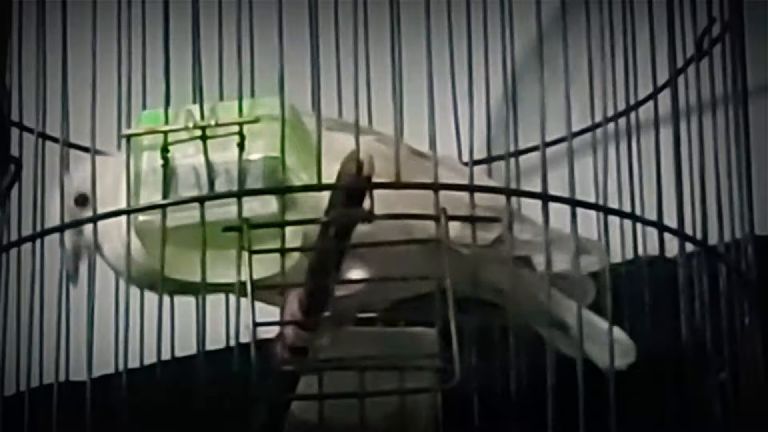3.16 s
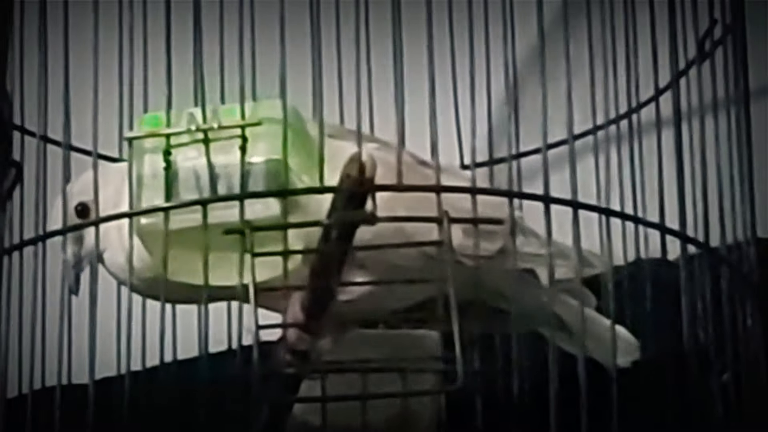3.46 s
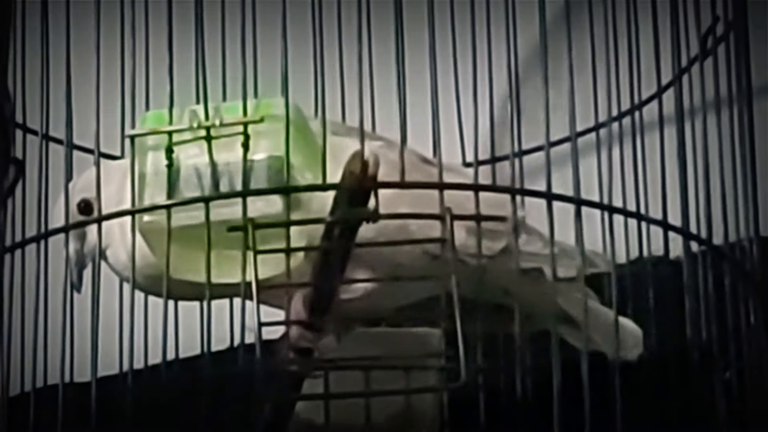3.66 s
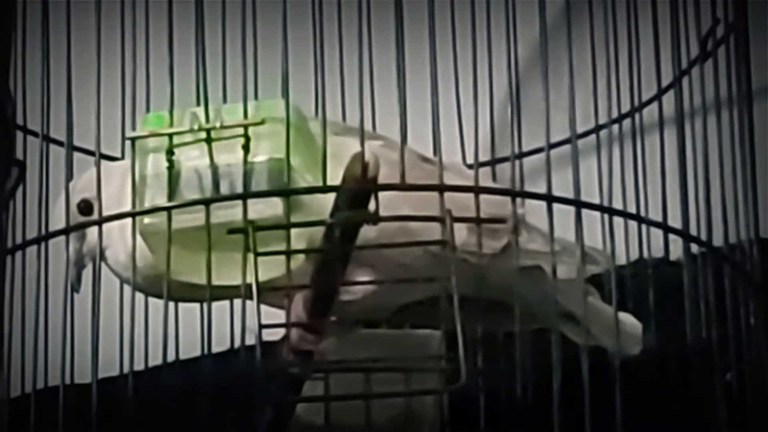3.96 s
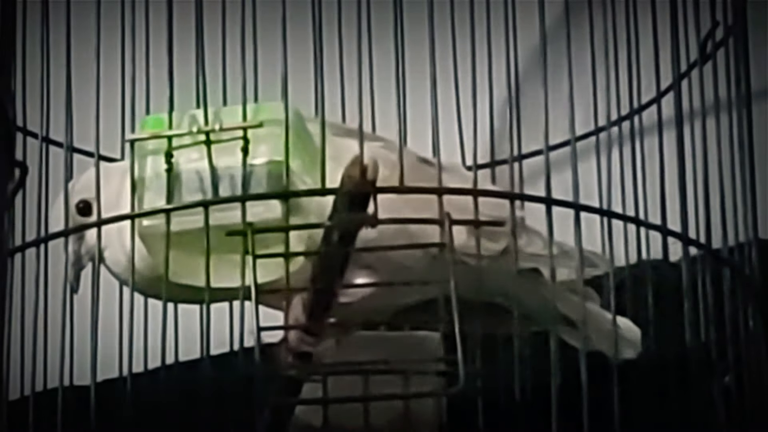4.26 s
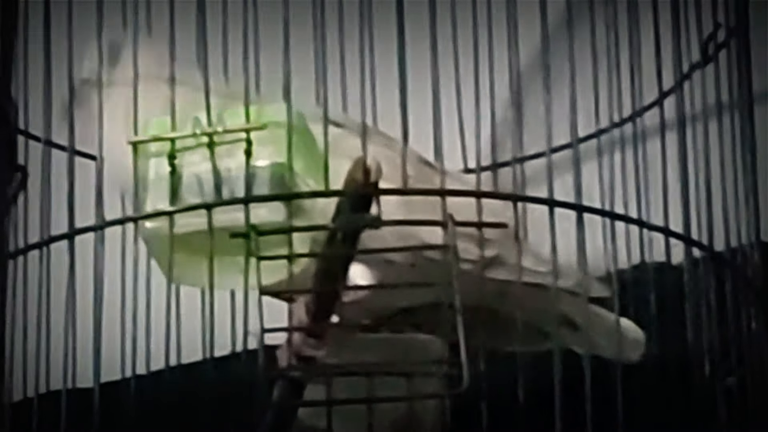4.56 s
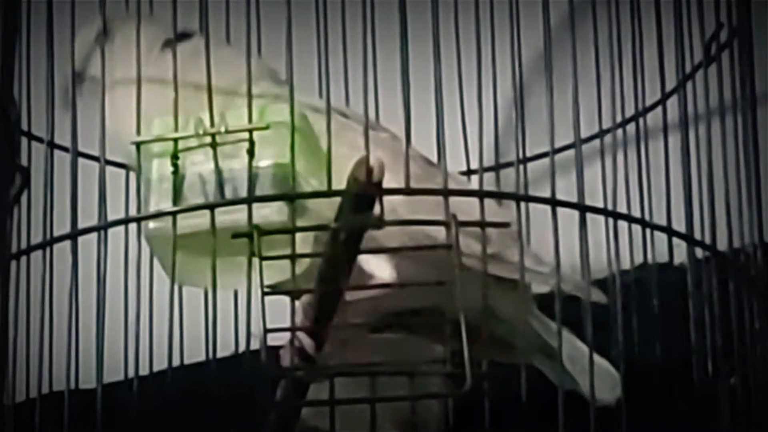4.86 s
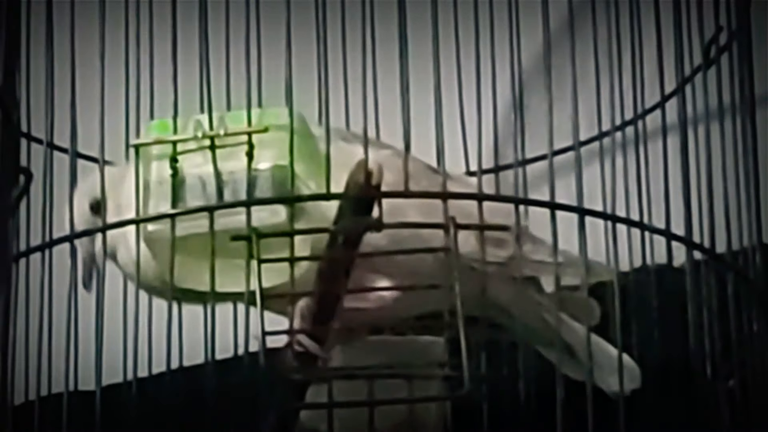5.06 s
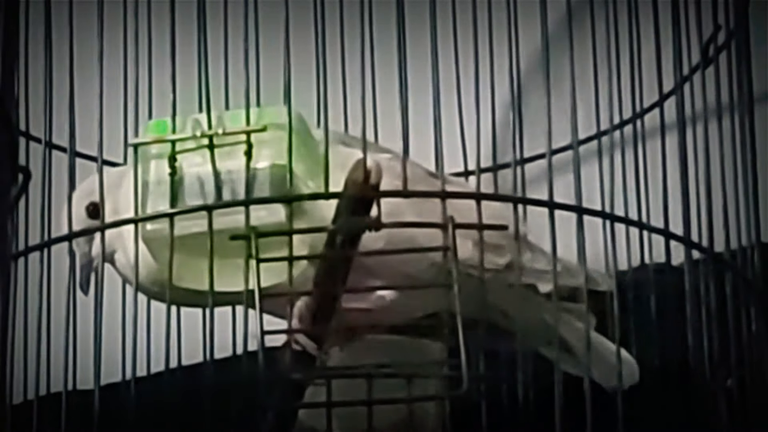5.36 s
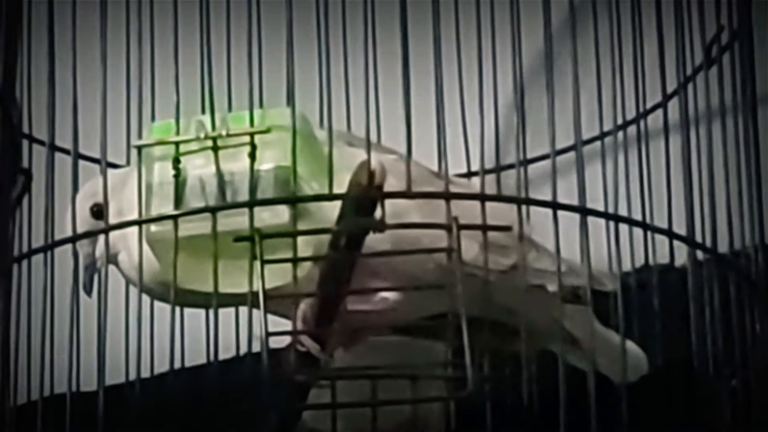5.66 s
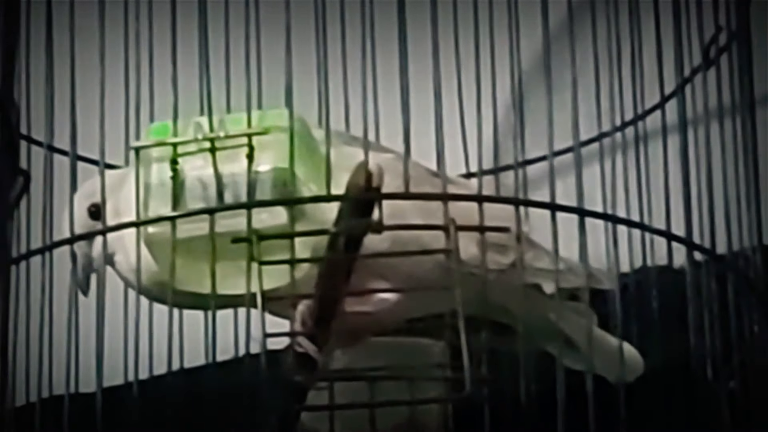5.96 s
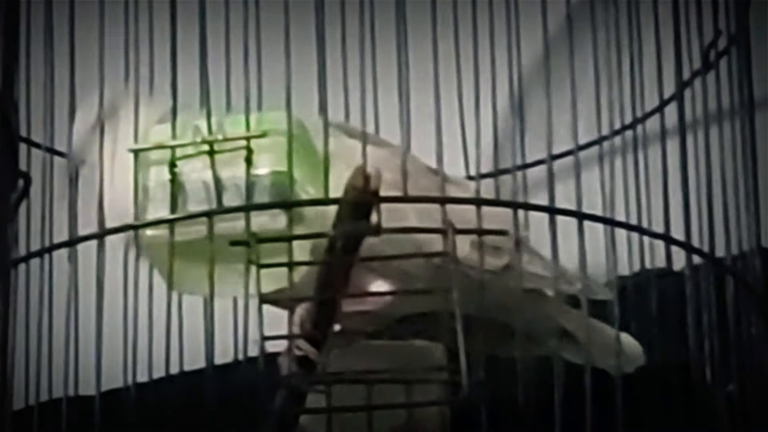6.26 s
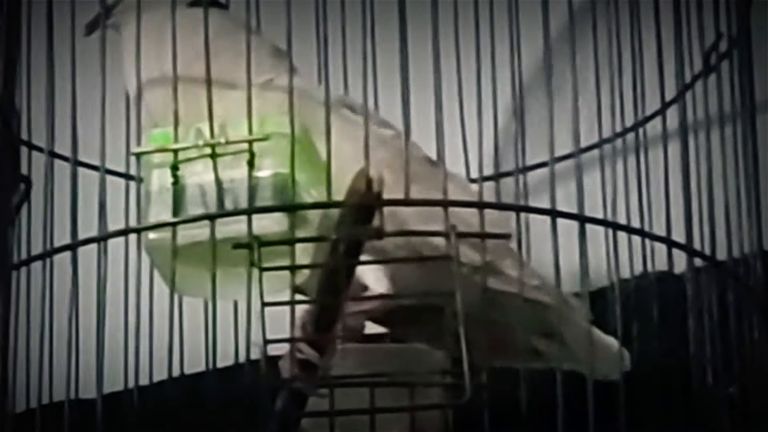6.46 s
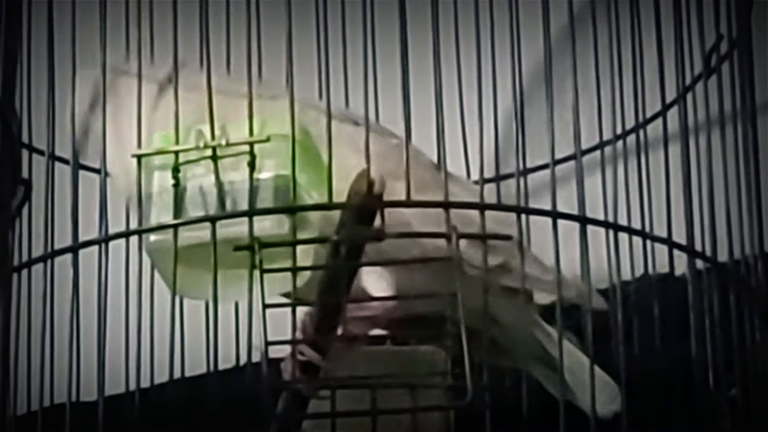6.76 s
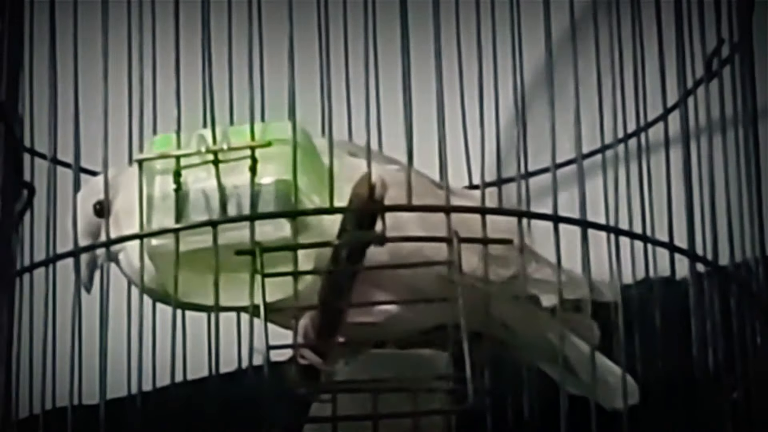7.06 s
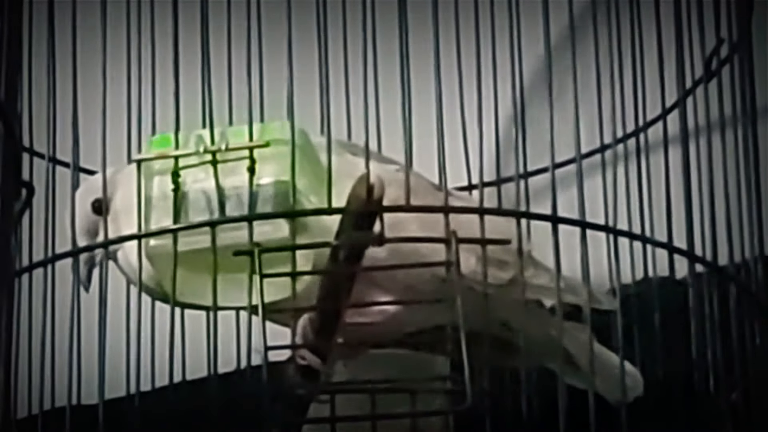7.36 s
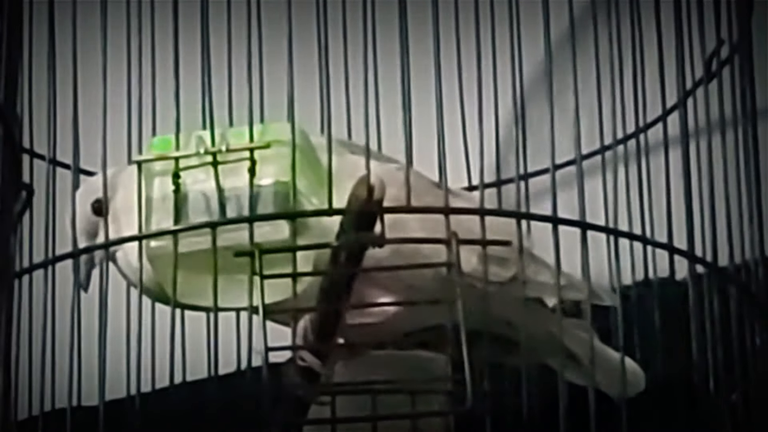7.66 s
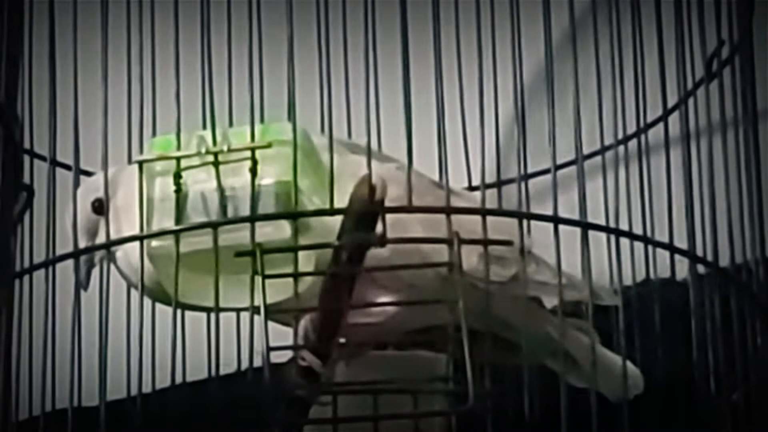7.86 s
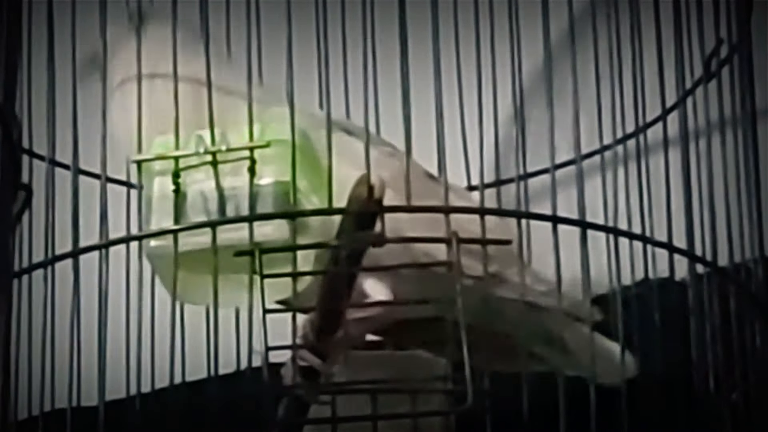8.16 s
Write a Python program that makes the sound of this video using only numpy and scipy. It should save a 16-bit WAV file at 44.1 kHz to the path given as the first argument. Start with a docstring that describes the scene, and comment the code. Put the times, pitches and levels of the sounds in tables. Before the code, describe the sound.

Close by, a dove in a cage repeats a loud, rolling call about every two seconds. Each round has a rising trill, a long coo with a falling tail, quiet wheezy breaths and a brief raspy coo. The walls of the small room add a short echo. Feathers brush the wires once, very softly, about halfway through, over a faint hum and hiss.

```python
"""A swelling trill opens the song of a caged dove, bowing and cooing close by in a small bare room.
Each trill runs into a long coo that turns rough, then pure, and breaks downward; soft wheezes follow
as the dove refills its crop, and a short hoarse coo leads to the next trill. Vibrating membranes in
the syrinx make the tone, the swollen crop filters it, and wall reflections colour every note.
A low hum, a thin hiss and one shuffle of feathers lie underneath."""
import sys
import numpy as np
from scipy import signal
from scipy.fft import rfft, irfft
from scipy.io import wavfile
from scipy.ndimage import uniform_filter1d, minimum_filter1d

SR = 44100
rng = np.random.default_rng(int(sys.argv[2]) if len(sys.argv) > 2 else 0)


def output_pcm(signal):
    """Save a mono or channel-first signal as 16-bit PCM at the path in sys.argv[1].

    Samples are clipped to [-1, 1] before scaling.
    """
    pcm = np.clip(np.atleast_2d(signal).T, -1, 1) * 32767
    wavfile.write(sys.argv[1], SR, np.round(pcm).astype(np.int16))


N = 410571
TIME = np.arange(N) / SR
STEP_S = .002  # spacing of the points on a contour


def amp(db):
    """Decibels to amplitude ratio."""
    return 10 ** (np.asarray(db) / 20)


def unit(x):
    """Normalisation to rms 1."""
    return x / np.sqrt(np.mean(x ** 2) + 1e-20)


def noise(points):
    """Spectral shaping: white noise takes on a spectrum of (frequency_hz, level_db) points."""
    hz, db = np.transpose(points)
    shape = np.interp(np.log(np.fft.rfftfreq(N, 1 / SR) + 1), np.log(hz), db)
    return unit(irfft(rfft(rng.standard_normal(N)) * amp(shape), N))


def band(size, hz, width_hz):
    """Band-limited noise with a Gaussian spectrum; centred on 0 Hz it is a random wander."""
    shape = np.exp(-.5 * ((np.fft.rfftfreq(size, 1 / SR) - hz) / width_hz) ** 2)
    return unit(irfft(rfft(rng.standard_normal(size)) * shape, size))


def add(mix, start_s, sound):
    """Superposition: a sound joins the mix at start_s."""
    start = round(start_s * SR)
    sound = sound[max(-start, 0):]
    part = mix[max(start, 0):][:len(sound)]
    part += sound[:len(part)]


def curves(times, *contours):
    t = np.arange(times[0], times[-1], 1 / SR)
    return [t] + [np.interp(t, times, contour) for contour in contours]


def ramp(t, start, seconds):
    """Linear rise from 0 to 1."""
    return np.clip((t - start) / seconds, 0, 1)


def fade(t, seconds):
    """Raised-cosine taper at both ends."""
    return np.sin(np.pi / 2 * ramp(np.minimum(t - t[0], t[-1] - t), 0, seconds)) ** 2


# Overtones of the voice, away from resonance: frequency_ratio, level_db
VOICE_OVERTONES = [(1.5, -53), (2, -48), (4, -55)]
def syrinx(hz, pipe_hz=905):
    """Source and filter: the swollen crop holds back overtones, save near the windpipe's resonances."""
    phase = 2 * np.pi * np.cumsum(hz) / SR
    tone = np.sin(phase)
    for ratio, db in VOICE_OVERTONES:
        resonance_db = 9 * np.cos(np.pi * ratio * hz / pipe_hz) ** 24
        tone += amp(db + resonance_db) * np.sin(ratio * phase)
    return np.sqrt(2) * tone


# Trills: crest_s, end_s, crest_relative_db, crest_pitch_hz, swell_per_pulse_db, late_gap_s
TRILL_PHRASES = [ (.054, .165, -7.5, 523.6, -0.5, .051), (1.998, 2.16, -7, 508, 4.5, .071),
                 (3.862, 4.03, -8, 514, 4, .05), (5.763, 5.92, -8.5, 514, 4.5, .072),
                 (7.604, 7.69, -7.5, 521, 4, .059), (9.442, 9.46, -4, 542, 5, .06)]
def trill(crest_s, end_s, crest_db, crest_hz, swell_db, late_gap_s):
    """Pulse modulation: pulses of tone slow down and climb to a crest, then may run on evenly."""
    quick_gap_s, crest_gap_s, low_hz, late_hz, sag_hz = .039, .067, 440, 501.2, 85
    before_crest = np.arange(7)
    gaps = quick_gap_s + (crest_gap_s - quick_gap_s) * .6 ** before_crest
    rising = np.c_[crest_s + gaps - np.cumsum(gaps),
                   crest_db - swell_db * before_crest,
                   low_hz + (crest_hz - low_hz) * .55 ** before_crest]
    late = [(s, crest_db - 4, late_hz) for s in np.arange(crest_s + late_gap_s, end_s, late_gap_s)]
    pulse_s, db, hz = np.transpose([*rising[::-1], *late])
    t = np.arange(pulse_s[0] - .04, pulse_s[-1] + .02, 1 / SR)
    since = t - pulse_s[:, None]
    width_s = .0098 * amp(.46 * np.minimum(db[:, None] + 10, 0))  # weak pulses are brief
    pulses = amp(db) @ np.exp(-abs(since / width_s) ** 2.5)
    # strong pulses leave a lower, weaker shoulder
    shoulders = amp(db - 11 + .5 * (db + 18.5)) @ np.exp(-((since - .023) / .009) ** 2)
    arch = np.exp(-(since / .019) ** 2).max(0)
    strength = amp(.3 * (np.interp(t, pulse_s, db) + 10.5))
    pitch = np.interp(t, pulse_s, hz) - sag_hz * (1 - arch) * strength
    pitch = (pitch + np.maximum(pitch, low_hz)) / 2  # the membranes resist going slack
    pitch += 7 * band(len(t), 0, 130)  # a slight unsteadiness
    return t[0], amp(5.5) * (pulses + shoulders) * syrinx(pitch) * fade(t, .005)


# Direct path, then wall and cage reflections, to each side: delay_ms, gain
LEFT_ARRIVALS = [(0, 1.01), (1.45, .28), (3.9, .32), (10.85, .26), (13.3, .7), (17.75, .21), (24.4, .4),
                 (31.7, .34), (37.8, .36), (47.7, .28), (58.75, .29), (76.6, .22), (92.4, .27)]
RIGHT_ARRIVALS = [(0, 1.05), (.45, .16), (6.05, .45), (12.8, .21), (19.8, .25), (31.8, .23), (33.3, .17),
                  (37.6, .36), (43.15, .26), (51.5, .22), (58.95, .31)]
def room(x, tail_db=-11, t60_s=.72, build_s=.1):
    """Convolution: strong early reflections comb-filter the sound, and diffuse reverberation follows."""
    t, channels = np.arange(SR // 2) / SR, []
    for arrivals in LEFT_ARRIVALS, RIGHT_ARRIVALS:
        response = rng.standard_normal(len(t)) * amp(-60 * t / t60_s) * ramp(t, 0, build_s) ** 2
        response *= amp(tail_db) / np.linalg.norm(response)
        for delay_ms, gain in arrivals:
            response[round(delay_ms * SR / 1000)] += gain
        channels.append(signal.fftconvolve(x, response)[:N])
    return np.array(channels)


# Spectrum of air rushing through the throat: frequency_hz, relative_density_db
BREATH_SPECTRUM = [(100, 2), (700, 7), (1050, -3), (1300, 0), (1850, -4.5), (2800, -21), (9000, -38)]
def breath(voice, edge_hz=635, lag_s=.025):
    """Flow noise: rushing air grows with the hoarse upper edge of the voice, mostly on the right."""
    mono = voice.mean(0)
    highpass = signal.firwin(2047, edge_hz, pass_zero=False, fs=SR)
    edge = signal.fftconvolve(mono, highpass, "same") + .035 * mono  # even a pure note leaks air
    effort = abs(uniform_filter1d(edge ** 2, size=3500)) ** .3
    effort = np.interp(TIME - lag_s, TIME, effort)
    return amp(-21.5) * effort * np.array([amp(-9) * noise(BREATH_SPECTRUM), noise(BREATH_SPECTRUM)])


# Spectrum of the room at rest: frequency_hz, relative_density_db
AMBIENT_SPECTRUM = [(30, -23.5), (70, -7.5), (250, -2), (800, -18), (2000, -24.5), (2300, -14),
                    (2700, -27.5), (8600, -32), (9300, -34.5), (14000, -34.5)]
def ambience(bass_hz=400):
    """Partial coherence: each side has its own room noise, and both share a bass layer."""
    separate = np.array([amp(-1.5) * noise(AMBIENT_SPECTRUM), noise(AMBIENT_SPECTRUM)])
    bass = signal.sosfilt(signal.butter(2, bass_hz, fs=SR, output="sos"), noise(AMBIENT_SPECTRUM))
    return amp(-52) * (separate + bass)


# Contour of the low hum: time_s, relative_db
HUM_CONTOUR = [(1.7, -51), (2.7, -59), (5.3, -65.5), (5.9, -55), (7.6, -51), (9.3, -52.5)]
def hum(pitch_hz=65.8):
    """Random amplitude modulation: a low sinusoid wavers as its level drifts."""
    level = amp(np.interp(TIME, *np.transpose(HUM_CONTOUR)))
    waver = 1 + .22 * band(N, 0, 8)
    return level * waver * np.sqrt(2) * np.sin(2 * np.pi * pitch_hz * TIME)


# Drones of the cage: start_s, length_s, relative_db
CAGE_DRONES = [(-.05, 0.23, -35), (1.94, 0.22, -39), (3.931, .22, -39.5), (7.941, .1, -40)]
def cage_drone(pitch_hz=119):
    """Resonance: the cage drones briefly in some phrases, a tone within a narrow band of noise."""
    mix = np.zeros(N)
    for start_s, length_s, db in CAGE_DRONES:
        t = np.arange(0, length_s, 1 / SR)
        tone = np.sin(2 * np.pi * pitch_hz * t) + .2 * band(len(t), pitch_hz, 30)
        add(mix, start_s, amp(db) * fade(t, .04) * tone)
    return mix


# Bands of thin hiss: centre_hz, width_hz, relative_db
HISS_BANDS = [(6254, 380, -57), (7880, 520, -66.5)]
def hiss(throb_hz=8.3, depth=.24):
    """Periodic amplitude modulation: narrow bands of high noise throb."""
    sides = [sum(amp(db) * band(N, hz, width) for hz, width, db in HISS_BANDS) for _ in range(2)]
    return np.array(sides) * (1 + depth * np.sin(2 * np.pi * throb_hz * TIME))


def rough_voice(t, db, hz, rough, rattle_hz, jitter, swing_hz):
    """Amplitude and frequency modulation: uneven membrane flapping chops the tone and shakes its pitch."""
    flap_phase = 2 * np.pi * np.cumsum(rattle_hz * (1 + jitter * band(len(t), 0, 50))) / SR
    chop = np.exp(rough * (.81 * np.cos(flap_phase) + .33 * band(len(t), 0, 78)))
    chop /= np.sqrt(uniform_filter1d(chop ** 2, size=1500))  # roughness leaves the power steady
    pitch = hz + rough * swing_hz * (np.sin(flap_phase + .25) + .98 * band(len(t), 0, 190))
    return amp(db) * chop * syrinx(pitch) * fade(t, .009)


# Long coos, levels relative: start_s, second_push_s, pure_s, break_s, end_s, first_push_db,
# second_push_db, rough_db, pure_db, crest_db, tail_db, top_hz, tail_hz, climb_roughness
LONG_COO_PHRASES = [ (0.171, 0.417, 0.452, .585, .958, 13.5, 8.5, -23, -26, -5.5, -14, 551.4, 469, 0.81),
                    (2.145, 2.333, 2.38, 2.534, 2.69, 11.5, 6.5, -21, -20.5, -7, -16.5, 547, 467, 0.66),
                    (4.015, 4.108, 4.215, 4.42, 4.58, 6.5, 5, -21.5, -17, -9, -16, 551.4, 469, 0.74),
                    (5.915, 6.012, 6.06, 6.255, 6.368, 7, 1.5, -23.5, -19.5, -8, -18.5, 554.7, 463, 0.97),
                    (7.685, 7.846, 7.905, 8.066, 8.165, 6, 5.5, -22.5, -17, -9, -18.5, 558.4, 464.8, 0.88)]
def long_coo(start_s, second_s, pure_s, break_s, end_s, first_db, second_db,
             rough_db, pure_db, crest_db, tail_db, top_hz, tail_hz, rough):
    """Changes of vibration regime: a rough climb clears to a pure note, then breaks to a sagging tail."""
    climb_from_hz, droop_hz, clearing_s, breaking_s, pure_rough = 528, 28.74, .024, .02, .079
    sag_hz_per_s, decay_db_per_s, dip_hz_per_db = 55, 26, 2.5
    t = np.arange(start_s, end_s, STEP_S)
    since_break = t - break_s
    push_db = first_db * np.exp(-((t - start_s) / .05) ** 2)
    push_db += second_db * np.exp(-((t - second_s) / .035) ** 2)
    # each regime holds level_db, pitch_hz, roughness
    climb = [rough_db + push_db,
             top_hz + (climb_from_hz - top_hz) * np.exp((start_s - t) / .13) - dip_hz_per_db * push_db,
             .55 + (rough - .55) * ramp(t, start_s, .013)]
    pure = [pure_db + (crest_db - pure_db) * ramp(t, pure_s, break_s - pure_s) ** 1.1,
            top_hz - droop_hz * np.exp(np.minimum(since_break, 0) / .032),
            np.full(len(t), pure_rough)]
    spent = np.exp((t - end_s) / (.18 * (end_s - break_s)))  # the dove runs out of air
    tail = [tail_db - decay_db_per_s * since_break - 2.5 * spent,
            tail_hz - sag_hz_per_s * since_break - 81 * spent,
            pure_rough + .57 * spent ** 2]
    cleared = ramp(t, pure_s - clearing_s / 2, clearing_s)
    broken = ramp(t, break_s - breaking_s / 2, breaking_s)
    contours = (1 - cleared) * climb + (cleared - broken) * pure + broken * tail
    voice = rough_voice(*curves(t, *contours), rattle_hz=61.42, jitter=.3, swing_hz=32.3)
    return start_s, amp(1.5) * voice


# Wheezy puffs: start_s, end_s, relative_db, start_pitch_hz, end_pitch_hz, throat_hz, roughness
WHEEZE_PUFFS = [ (1.01, 1.155, -23, 236.3, 231.3, 472, 0.26), (1.188, 1.313, -28.5, 237.7, 231.7, 715, .65),
                (2.769, 2.934, -40, 207.6, 211, 620, 0.26), (2.891, 3.152, -29, 214.7, 242.8, 630, 0.59),
                (4.659, 4.925, -31, 207.8, 198.3, 537, 0.22), (4.847, 5.043, -28.5, 179.8, 182.3, 667, .45),
                (6.448, 6.703, -34.5, 196.7, 184.4, 534, 0.22),
                (6.685, 6.875, -30, 199.4, 185.6, 664, 0.47), (8.281, 8.43, -34, 195.5, 184.3, 530, 0.19),
                (8.438, 8.559, -35, 163.5, 165, 630, 0.15), (8.549, 8.75, -33, 185, 178, 704, 0.3)]
def wheeze(start_s, end_s, peak_db, start_hz, end_hz, throat_hz, mid_rough):
    """Formant filtering: a low buzz is strongest near the throat resonance and frays as it turns hoarse."""
    arch_db, throat_rise_hz, throat_width_hz, crop_hz, crop_width_hz = 6.5, 25, 90, 520, 240
    t, = curves(np.arange(start_s, end_s, STEP_S))
    progress = ramp(t, start_s, end_s - start_s)
    db = peak_db - arch_db * (2 * progress - 1) ** 2
    hz = start_hz + (end_hz - start_hz) * progress
    formant_hz = throat_hz + throat_rise_hz * (progress - .5)  # the throat tightens
    rough = np.clip(mid_rough * (1 + .57 * (progress - .5)), 0, 1)
    phase = 2 * np.pi * np.cumsum(hz * (1 + .07 * rough * band(len(t), 0, 95))) / SR
    orders = np.arange(1, 6)[:, None]
    throat = np.exp(-.5 * ((orders * hz - formant_hz) / throat_width_hz) ** 2)
    crop = np.exp(-.5 * ((orders * hz - crop_hz) / crop_width_hz) ** 2)  # the crop radiates a broad band
    weights = throat + amp(-7) * crop
    weights /= np.sqrt((weights ** 2).sum(0))
    buzz = np.zeros(len(t))
    for k, weight in zip(orders, weights):
        frayed = band(len(t), 0, 83) * np.sin(k * phase) + band(len(t), 0, 130) * np.cos(k * phase)
        buzz += weight * (np.sqrt(2 - 2 * rough) * np.sin(k * phase) + rough * frayed)
    return start_s, amp(db - 2) * buzz * fade(t, .016)


# Short coos: start_s, length_s, relative_db, accent_db, top_pitch_hz, closing_pitch_hz
SHORT_COO_PHRASES = [ (1.318, 0.24, -23.5, 3.5, 579.4, 532.7), (3.162, 0.24, -23, 3.5, 576.4, 535.7),
                     (5.06, .27, -23.5, 3.5, 576.6, 492.9), (6.879, 0.26, -22.5, 0.5, 553.8, 525),
                     (8.724, 0.25, -23.5, 3, 580.3, 544.8)]
def short_coo(start_s, length_s, body_db, accent_db, top_hz, closing_hz):
    """Roughness from deepening modulation: a clear accent leaps in pitch, starts to rattle and settles."""
    opening_hz, attack_s, peak_s, settle_s, roughen_s, release_s = 484.7, .013, .085, .1, .06, .06
    t = np.arange(0, length_s, STEP_S)
    db = body_db + accent_db * np.exp(-(np.maximum(t - attack_s, 0) / .035) ** 2)
    db -= 7 * (1 - ramp(t, 0, attack_s)) + 9 * ramp(t, length_s - release_s, release_s)
    hz = opening_hz + (top_hz - opening_hz) * ramp(t, 0, peak_s)
    hz += (closing_hz - top_hz) * ramp(t, peak_s, settle_s)
    rough = .35 + .55 * ramp(t, 0, roughen_s)
    voice = rough_voice(*curves(t, db, hz, rough), rattle_hz=81.42, jitter=.18, swing_hz=46.5)
    return start_s, amp(3) * voice


# Feathers brushing the wires: start_s, level_db, decay_s
FEATHER_BRUSHES = [(4.87, -58.5, 0.38), (4.975, -53, .04), (5.12, -57.5, 0.1)]
def feathers():
    """Friction noise: short dry swishes die away exponentially as the dove bows."""
    envelope = np.zeros(N)
    t = np.arange(SR // 2) / SR
    for start_s, db, decay_s in FEATHER_BRUSHES:
        add(envelope, start_s, amp(db) * np.exp(-t / decay_s) * fade(t, .004))
    return envelope * np.array([band(N, 7500, 5000), band(N, 7500, 5000)])


def scene():
    """Superposition: the reverberant voice sums with breath, background and feathers."""
    coos, wheezes = np.zeros((2, N))
    for row in TRILL_PHRASES:
        add(coos, *trill(*row))
    for row in LONG_COO_PHRASES:
        add(coos, *long_coo(*row))
    for row in SHORT_COO_PHRASES:
        add(coos, *short_coo(*row))
    for row in WHEEZE_PUFFS:
        add(wheezes, *wheeze(*row))
    coos, wheezes = room(coos * fade(TIME, .008)), room(wheezes)
    dove = coos + wheezes + breath(coos + .4 * wheezes)
    lean_right = amp([[-2], [2]])
    background = ambience() + lean_right * (hum() + cage_drone() + hiss())
    return dove + background + feathers()


def record(dry, ceiling=.99, clip_level=.975, recover_db_per_s=70, cutoff_hz=15450):
    """Peak limiting: the loudest notes are held near full scale and just clip; a low-pass follows."""
    excess_db = np.maximum(20 * np.log10(abs(dry).max(0) / ceiling + 1e-9), 0)
    recovery_db = TIME * recover_db_per_s
    held_db = np.maximum.accumulate(excess_db + recovery_db) - recovery_db
    reduction_db = uniform_filter1d(-minimum_filter1d(-held_db, size=100), size=200)
    limited = np.clip(dry * amp(-reduction_db), -clip_level, clip_level)
    lowpass = signal.firwin(511, cutoff_hz, window=("kaiser", 9), fs=SR)
    return signal.oaconvolve(limited, lowpass[None], "same")


dry = scene()
out = record(dry)
output_pcm(out)
```